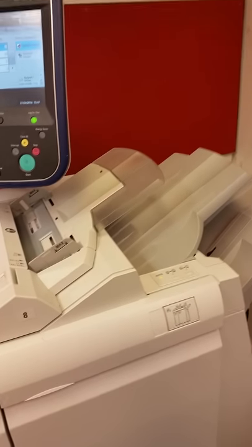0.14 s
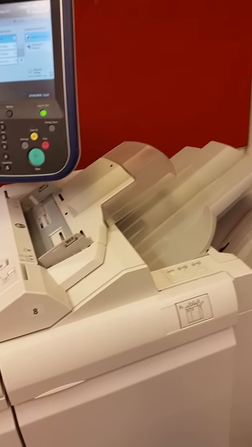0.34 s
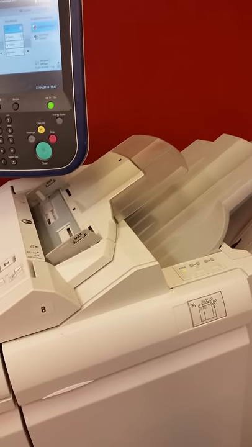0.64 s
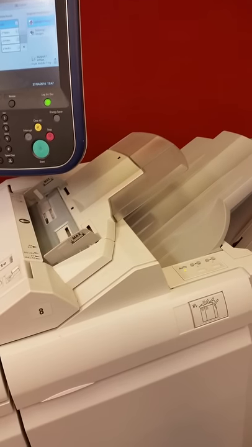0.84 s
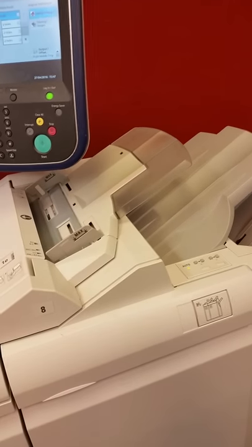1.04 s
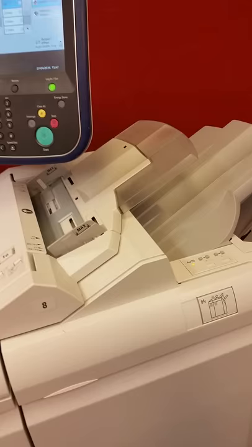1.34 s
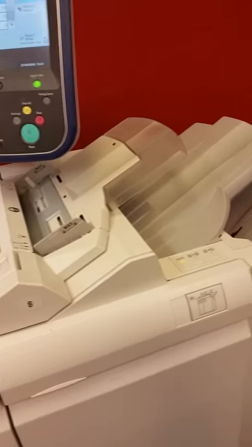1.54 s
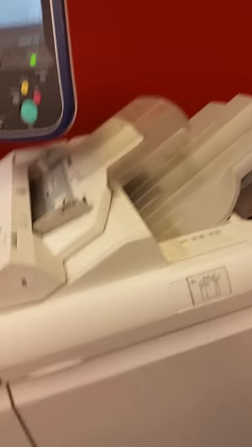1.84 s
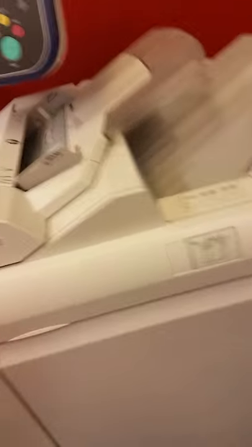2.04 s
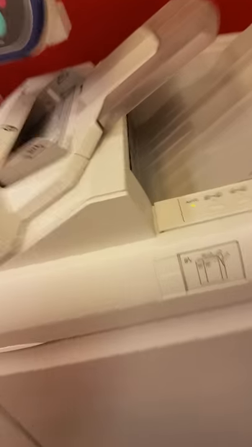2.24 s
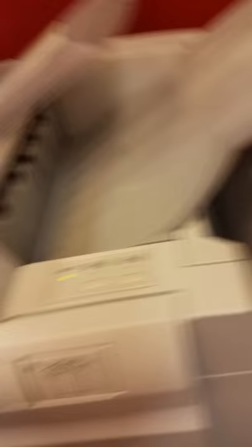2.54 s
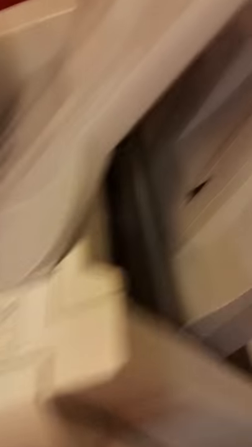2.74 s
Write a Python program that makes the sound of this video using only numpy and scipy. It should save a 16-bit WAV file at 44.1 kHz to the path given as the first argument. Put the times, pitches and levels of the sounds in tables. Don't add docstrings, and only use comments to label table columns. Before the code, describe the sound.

A big copier clatters loudly about every second and a quarter above a low mechanical hum

```python
import sys
import numpy as np
from scipy import signal
from scipy.fft import rfft, irfft
from scipy.io import wavfile
from scipy.ndimage import uniform_filter1d

SR = 44100
rng = np.random.default_rng(int(sys.argv[2]) if len(sys.argv) > 2 else 0)


def persist_wave(psi):
    counts = np.round(np.clip(psi, -1, 1) * 32767).astype(np.int16)
    wavfile.write(sys.argv[1], SR, np.atleast_2d(counts).T)


def volts_from_decibels(level):
    exponent = np.asarray(level, float) / 20
    return 10 ** exponent


N = 127890


def unit(x):
    return x / np.sqrt(np.mean(x ** 2))


def curve(table):
    hz, value = np.array(table, float).T
    return np.interp(np.log(np.fft.rfftfreq(N, 1 / SR) + 1), np.log(hz), value)


def over_time(t, table, **outside):
    s, db = np.array(table).T
    return np.interp(t, s, db, **outside)


def shape(x, gain):
    return irfft(rfft(x) * gain, N)


def ring(x, hz, width_hz, times=1):
    b, a = signal.iirpeak(min(hz, .45 * SR), max(hz / width_hz, .3), SR)
    for _ in range(times):
        x = signal.lfilter(b, a, x)
    return x


def ports(left_db, right_db):
    return np.array([[left_db], [right_db]])


# (frequency [Hz], correlation [-])
LIKENESS = [(100, 0.99), (290, 0.91), (640, 0.53), (1400, 0.18), (3000, 0.01)]


def pair(grain_db=0.):
    mid, side = rng.standard_normal((2, N)) * volts_from_decibels(grain_db * rng.exponential(1, (2, N)))
    alike = np.clip(curve(LIKENESS), 0, 1)
    mid = shape(mid, np.sqrt(1 + alike))
    side = shape(side, np.sqrt(1 - alike))
    return unit(np.array([mid + side, mid - side]))


def walk(rate_hz):
    k = int(SR / rate_hz)
    steps = np.repeat(rng.standard_normal(N // k + 1), k)
    return unit(uniform_filter1d(uniform_filter1d(steps, k), k)[:N])


def fall(t, t60_s, rise_s=.0045):
    t = np.maximum(t, 0)
    return (1 - np.exp(-t / rise_s)) * np.exp(-np.log(1000) * t / t60_s)


# (frequency [Hz], level [dB per Hz])
FAN_SPECTRUM = [(200, -2.5), (322, -4.5), (635, -15.5), (2300, -20.5), (4500, -24.5), (5500, -31),
                (7000, -38), (16000, -40)]
# (time [s], level [dB])
FAN_NEARNESS = [(0, 9), (.45, 4), (.8, 0), (1.0, -2), (1.27, 1.5), (1.8, 1), (2.0, 1), (2.5, 4.5), (2.9, 6)]


def fans(t):
    air = unit(shape(pair(), volts_from_decibels(curve([(60, -35)] + FAN_SPECTRUM))))
    return air * volts_from_decibels(-46.5 + over_time(t, FAN_NEARNESS) + .86 * walk(12.1))


# (frequency [Hz], width [Hz], level [dB])
DRIVE_MODES = [(42, 7.4, -49.5), (77.6, 12.2, -43), (107.76, 2.5, -35.5), (138.6, 14.3, -35),
               (166.2, 11.7, -42), (188.6, 15.5, -46), (257, 40, -53), (320.4, 14, -53.5),
               (429.7, 9.2, -59.5), (731, 90, -55.5)]


def drive():
    out = 0
    for hz, width_hz, db in DRIVE_MODES:
        mode = unit(ring(pair(), hz, 1.66 * width_hz, 2))
        out = out + volts_from_decibels(db + 1.9 * walk(5.02)) * mode
    return out


# (time [s], level [dB])
WHINE_LEVEL = [(0, -53), (.4, -54.5), (1.27, -58.5), (1.86, -56), (2.0, -66), (2.5, -61), (2.9, -56)]


def whine(t):
    whine_hz, port_phase_rad = 1737, np.array([[0], [.8]])
    tone = np.sin(2 * np.pi * whine_hz * t + .38 * walk(27) + port_phase_rad)
    return tone * volts_from_decibels(over_time(t, WHINE_LEVEL) + 1.5 + 1.6 * walk(9))


# (start [s], length [s], left [dB], right [dB], centre [Hz])
RUB_EVENTS = [(1.87, 0.04, -36.5, -22, 308), (1.871, 0.045, -40, -27, 1000),
              (1.885, 0.029, -47, -34.5, 2470), (1.8615, .003, -56, -40, 10500),
              (1.87, 0.05, -67, -55, 13200), (2.005, 0.029, -58, -62, 7600), (2.008, .04, -53.5, -54, 2600),
              (2.169, 0.057, -43.5, -60, 4140), (2.162, 0.061, -43.5, -54, 2770),
              (2.274, .025, -51.5, -57, 4200), (2.401, 0.059, -53.5, -62, 4200),
              (2.15, 0.42, -56.5, -52.5, 685), (2.419, 0.14, -47, -47, 1120), (2.55, .045, -29, -27, 1150),
              (0, .045, -58, -56, 9000)]


def rubs(t):
    attack_s, release_s, top_width_hz = .0021, .0046, 1960
    out = np.zeros((2, N))
    for at, length, left_db, right_db, hz in RUB_EVENTS:
        gate = np.clip(np.minimum((t - at) / attack_s, (at + length - t) / release_s), 0, 1)
        scratch = rng.standard_normal((2, N)) * volts_from_decibels(1.5 * rng.exponential(1, N))
        width_hz = min(hz, top_width_hz * max(hz / 5000, 1) ** 2)
        scratch = unit(ring(scratch, hz, width_hz, 3))
        out += scratch * volts_from_decibels(2.1 * walk(150)) * gate * volts_from_decibels(ports(left_db, right_db))
    return out


# (start [s], level [dB], treble [dB], treble of after-rattles [dB])
MACHINE_CYCLES = [
    (0.043, .7, 1.8, -1.5),
    (1.286, 2.6, 2.2, -5),
    (2.53, 2.8, 3, -1.5),
]
# (time after start [s], rattle [dB], thud [dB], rattle t60 [s])
CYCLE_BLOWS = [(-.008, -27, -30, 0.63), (.023, -19.5, -23, 0.26), (.06, -25.5, -24, 0.2),
               (0.093, -30.5, -23, 0.7), (0.124, -18.5, -29, .3), (.18, -20, -20, 0.087),
               (.205, -31, -24, 0.13), (.24, -45, -25, .1), (.28, -39, -29, .12), (.345, -45, -36.5, .1),
               (0.412, -43, -48.5, .12), (0.489, -60, -47, 0.17)]


def blow_envelope(t, column, t60s, treble, scatter):
    return_s, after_s, return_treble_db = .09, .22, 2.5
    swell_s, scatter_db = .022, 1.5
    coarse = t[::32]
    power = 0
    for (start, db, treble_db, after_db), cycle_scatter in zip(MACHINE_CYCLES, scatter):
        for i, (blow, chance, t60) in enumerate(zip(CYCLE_BLOWS, cycle_scatter, t60s)):
            u = coarse - start - blow[0]
            stroke_db = after_db if blow[0] > after_s else return_treble_db * (blow[0] > return_s)
            swell = np.clip(u / swell_s, 0, 1) ** 2 if i == 0 else 1
            level_db = db + treble * (treble_db + stroke_db) + blow[column] + scatter_db * chance[column - 1]
            power = power + (swell * volts_from_decibels(level_db) * fall(u, t60)) ** 2
    return np.interp(t, coarse, np.sqrt(power))


# (frequency [Hz], level [dB])
RATTLE_COLOUR = [(250, -4.5), (700, -0.5), (2500, -3), (3300, -8), (6500, -9), (9700, -7.5), (13000, -5.5),
                 (16000, -10)]
# (frequency [Hz], width [Hz], level [dB])
PANEL_MODES = [(734, 290, -13), (1385, 24, 6), (2270, 94, -1), (2584, 120, -0.5)]


def rattle(t, scatter):
    patchy_db, patch_hz, top_damping, panel_db = 1.9, 75, .3, -6.5
    grains = rfft(pair(1.5))
    octave = np.log2(np.fft.rfftfreq(N, 1 / SR) + 1)
    t60s = np.array(CYCLE_BLOWS)[:, 3]
    hit = 0
    for k in range(7):
        part = irfft(grains * np.cos(np.pi / 2 * np.clip(octave - 8 - k, -1, 1)) ** 2, N)
        treble = max(k - 2, 0) / 4
        envelope = blow_envelope(t, 1, t60s / (1 + top_damping * treble), treble, scatter)
        hit = hit + part * volts_from_decibels(patchy_db * walk(patch_hz)) * envelope
    panels = sum(volts_from_decibels(db) * ring(hit, hz, width_hz) for hz, width_hz, db in PANEL_MODES)
    return shape(hit + volts_from_decibels(panel_db) * panels, volts_from_decibels(curve(RATTLE_COLOUR) + 8))


# (frequency [Hz], level [dB])
THUD_COLOUR = [(50, -25), (90, -5.5), (160, -3.5), (350, -10), (600, -16.5), (1500, -29)]


def thud(t, scatter):
    boom = unit(shape(pair(), volts_from_decibels(curve(THUD_COLOUR))))
    return boom * blow_envelope(t, 2, [.2] * len(CYCLE_BLOWS), 0, scatter)


def room(t, dry):
    t60_s, top_t60_s, room_db, delay_s = .62, .33, -12, .01
    tail = pair()[:, :SR]
    soft = signal.filtfilt(*signal.butter(2, 5500., fs=SR), tail)
    u = t[:SR] - delay_s
    tail = soft * fall(u, t60_s) + (tail - soft) * fall(u, top_t60_s)
    tail = tail / np.sqrt(np.sum(tail ** 2) / 2)
    return volts_from_decibels(room_db) * signal.fftconvolve(dry, tail, axes=1)[:, :N]


def banging(t):
    scatter = rng.standard_normal((len(MACHINE_CYCLES), len(CYCLE_BLOWS), 2))
    dry = rattle(t, scatter) + thud(t, scatter)
    return dry + room(t, dry)


# (time [s], left [dB], right [dB], first half swing [ms], nail tick [dB])
KNOCK_EVENTS = [
    (1.8628, -31, -23.5, .5, -28),
    (1.869, -14.5, -1.5, 1.25, -23),
    (1.8748, -15, -5, 2.3, -45),
    (1.9116, -28, -4, 1.56, -26.5),
    (2.093, -27, -7.5, 1.55, -34),
    (2.144, -12.5, -35, 1.2, -30.5),
    (2.168, -18, -41, 0.71, -35),
    (2.2729, -14.5, -23.5, 1.1, -31),
    (2.8013, -2, -22, .9, -15),
]


def knocks(t):
    t60_s, slowing, far_damping, tick_hz, tick_width_hz = .031, .54, 2.1, 3100, 3000.
    lowpass = signal.butter(2, 2200., fs=SR)
    out = np.zeros((2, N))
    for at, left_db, right_db, half_ms, tick_db in KNOCK_EVENTS:
        u = np.maximum(t - at, 0)
        level_db = ports(left_db, right_db)
        damping = np.where(ports(left_db < right_db, left_db > right_db), far_damping, 1)
        wave = -np.sin(np.pi * (u * 1000 / half_ms) ** slowing)
        swing = wave * fall(u, t60_s / damping, .00023) * 1.14
        sign = np.sign(left_db - right_db) * ports(1, -1)
        out += signal.lfilter(*lowpass, sign * swing) * volts_from_decibels(level_db)
        tick = volts_from_decibels(tick_db + 6) * rng.standard_normal(N) * np.exp(-u / .00097) * (u > 0)
        tick = ring(tick, tick_hz, tick_width_hz, 3)
        out += tick * volts_from_decibels(.44 * (level_db - max(left_db, right_db)))
    return out


# (time [s], level [dB])
SLIDE_LEVEL = [(2.09, -49), (2.096, -46), (2.122, -54), (2.256, -53.5), (2.322, -47), (2.484, -42),
               (2.52, -47)]


def slide(t):
    hz, width_hz, left_db = 13400, 5400, -22
    colour = [(6000, -30), (9500, -14), (hz - width_hz / 3, -4), (hz, 0), (15500, -6)]
    hiss = unit(shape(pair(.91), volts_from_decibels(curve(colour))))
    level_db = over_time(t, SLIDE_LEVEL, left=-120, right=-120) + 5 + 1.3 * walk(39.9)
    return hiss * volts_from_decibels(level_db) * volts_from_decibels(ports(left_db, 0))


# (frequency [Hz], level [dB])
LEFT_COLOUR = [(700, 0), (2500, -2), (3500, -1), (4400, 3), (5400, 0), (8200, 3.5), (11000, -6),
               (15500, -4)]
RIGHT_COLOUR = [(700, 0), (2500, 1.5), (3800, -4.5), (5600, -9), (7600, -4), (9600, 9), (11500, 0.5),
                (15500, -3)]


def scene():
    t = np.arange(N) / SR
    machine = fans(t) + drive() + whine(t) + banging(t)
    hand = rubs(t) + knocks(t) + slide(t)
    return shape(machine + hand, volts_from_decibels(np.array([curve(LEFT_COLOUR), curve(RIGHT_COLOUR)])))


def roll_off(x):
    return signal.sosfilt(signal.butter(12, 16360, fs=SR, output="sos"), x)


def record(dry):
    band = signal.sosfilt(signal.ellip(8, .2, 60, 15750, fs=SR, output="sos"), dry)
    mix = signal.lfilter(*signal.butter(2, 35., "high", fs=SR), band)
    return roll_off(mix)


dry = scene()
out = record(dry)
persist_wave(out)
```